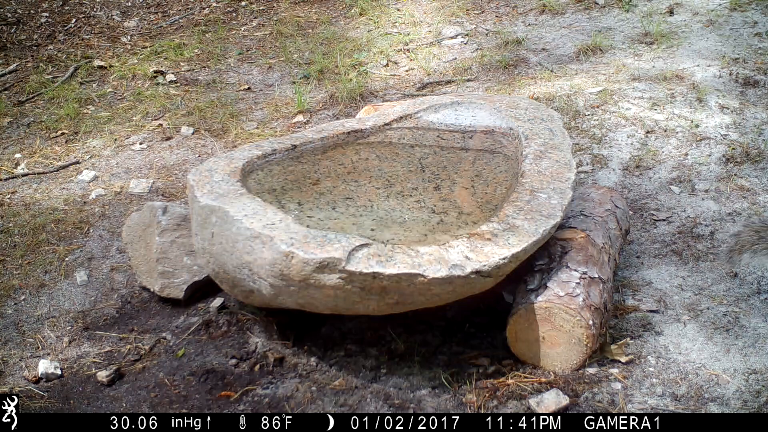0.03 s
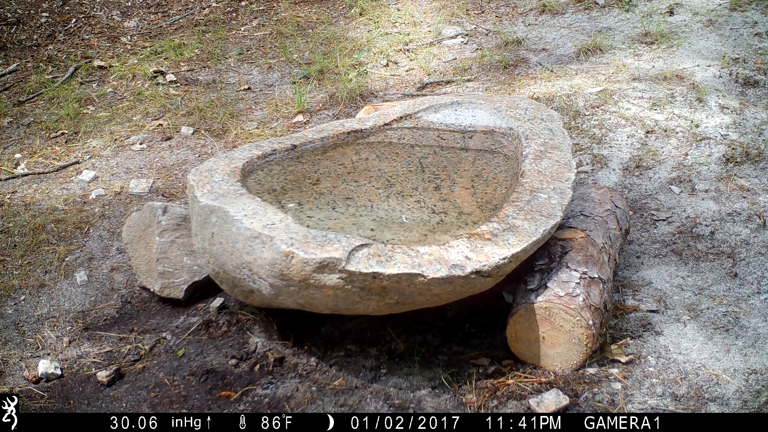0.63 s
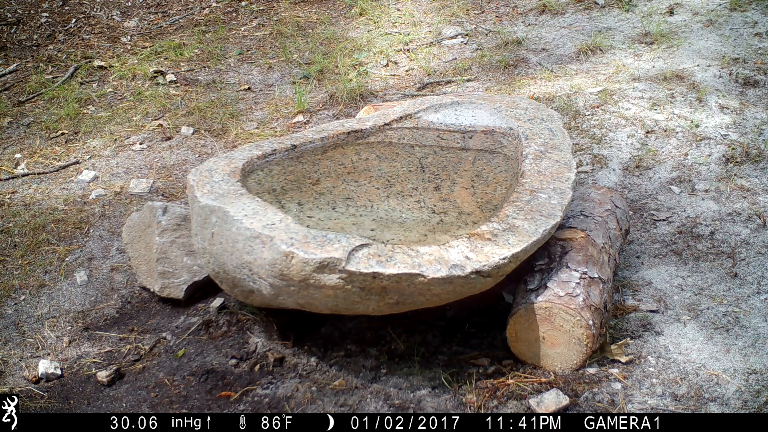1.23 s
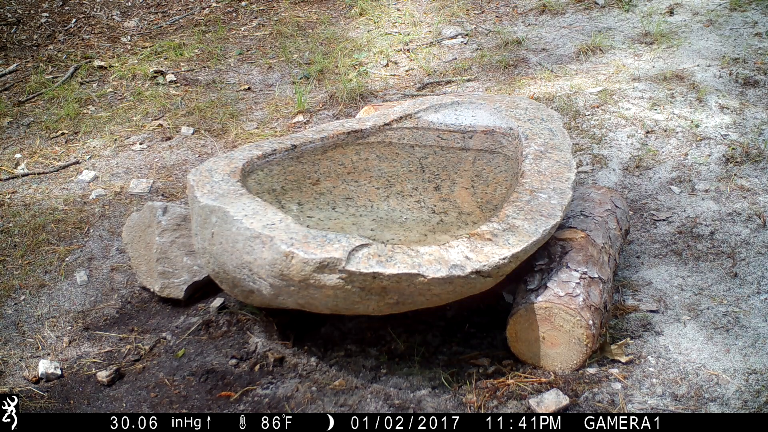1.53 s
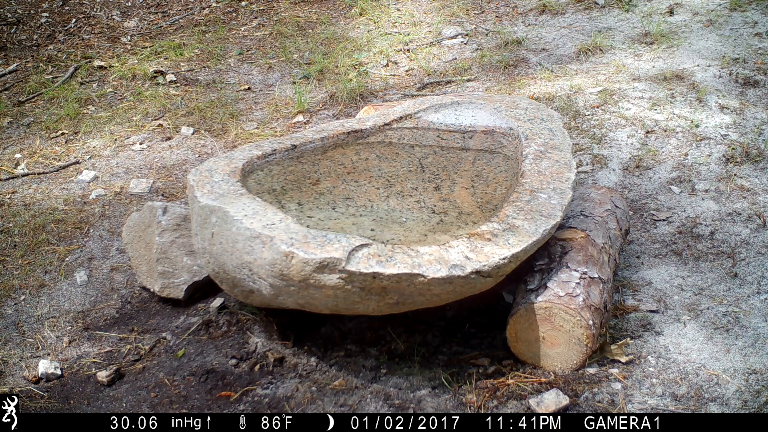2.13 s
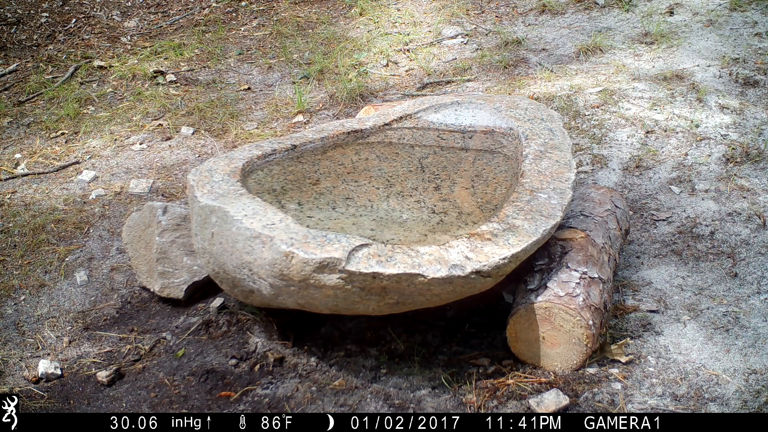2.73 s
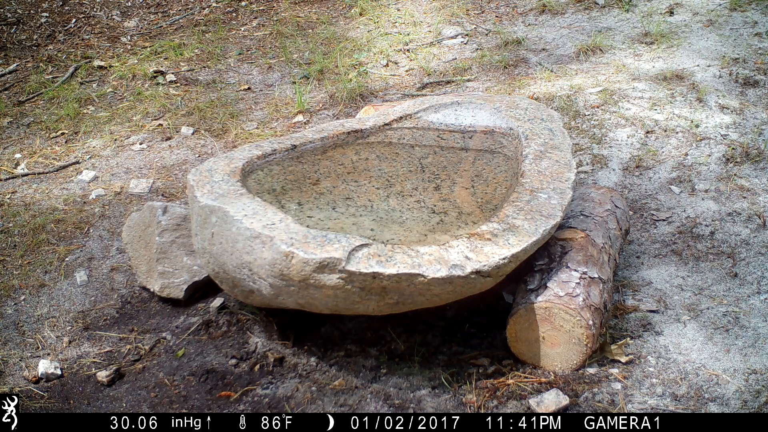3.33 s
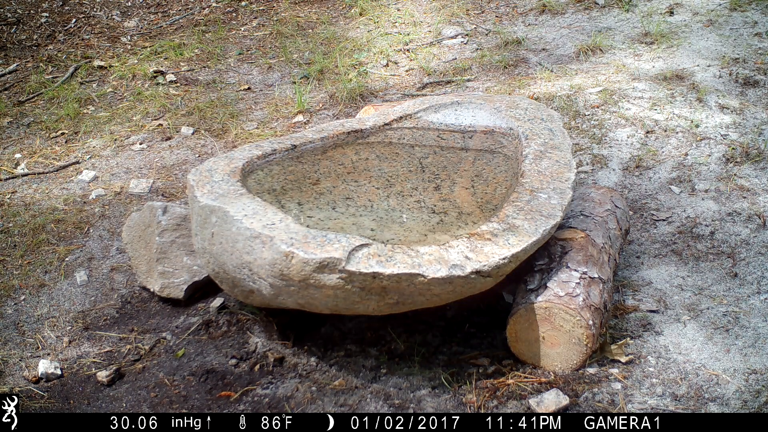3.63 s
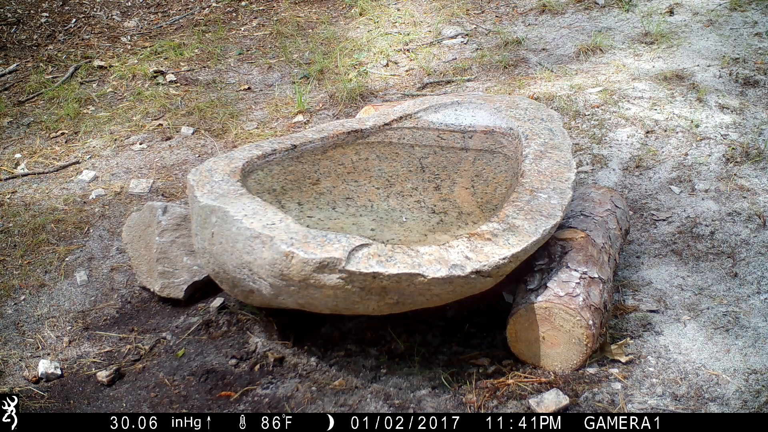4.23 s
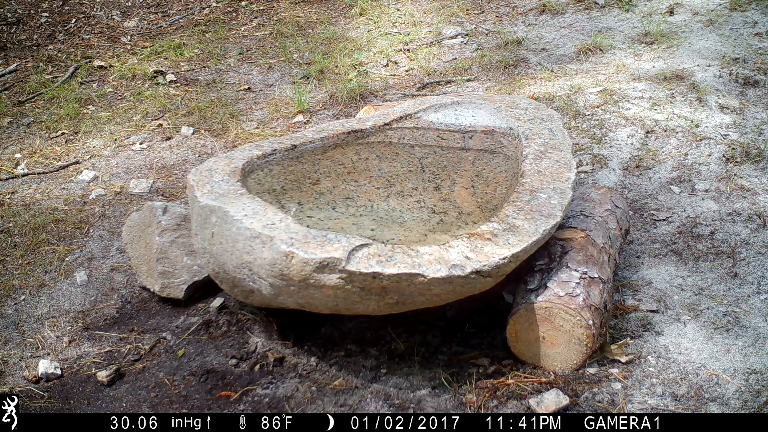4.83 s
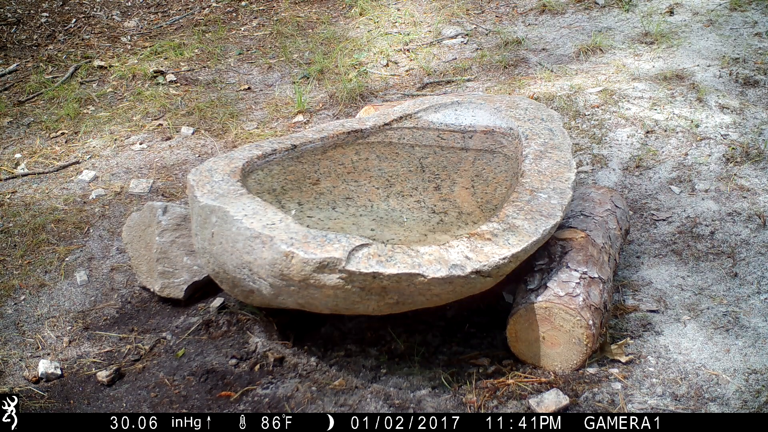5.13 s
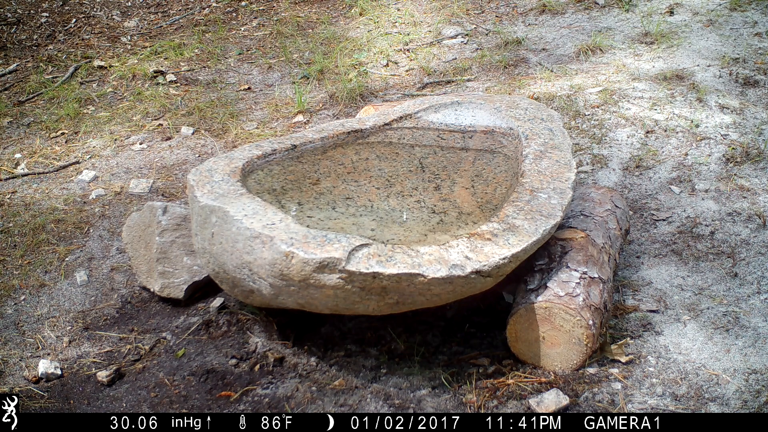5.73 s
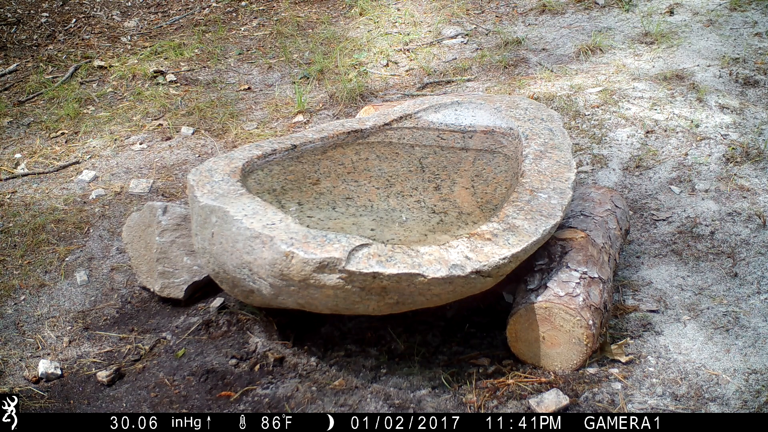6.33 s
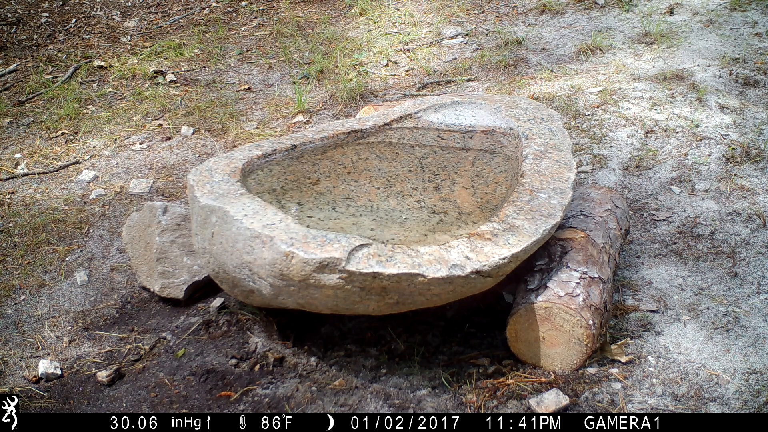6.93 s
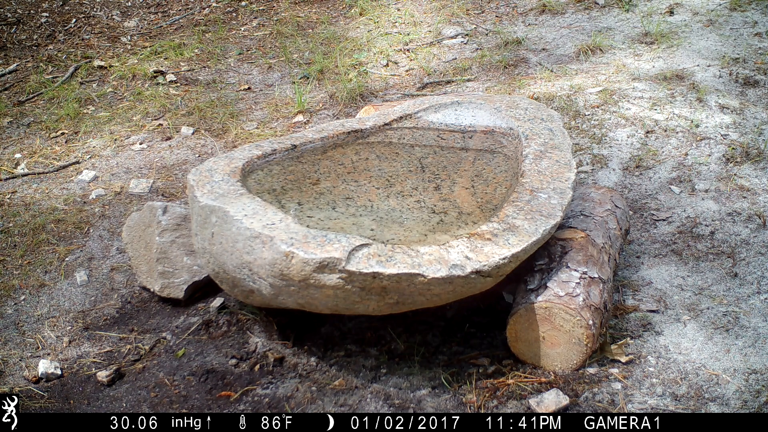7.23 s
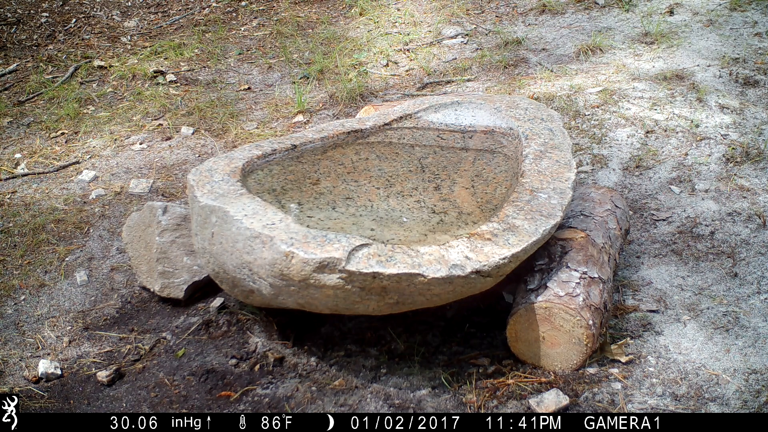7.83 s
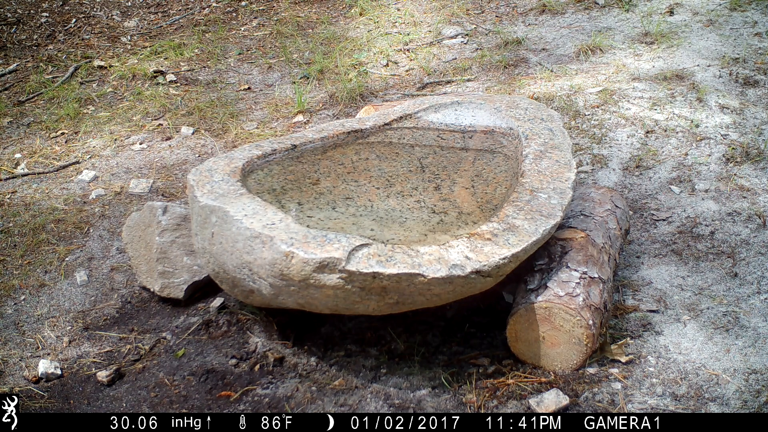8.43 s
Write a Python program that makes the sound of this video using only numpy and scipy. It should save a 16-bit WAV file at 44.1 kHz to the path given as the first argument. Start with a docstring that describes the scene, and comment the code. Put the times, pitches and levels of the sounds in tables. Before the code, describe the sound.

Two jays give harsh, jeering calls in a wood, then one calls alone, over soft low knocks and a steady hiss.

```python
"""Two jays jeer in a wood, overlapping at first, then one alone; a trail camera listens.
Each call is two linked voices, made by two vibrating membranes in the bird's throat. They swoop up,
sag, and break into a rasp as the air pressure falls. The trees echo the calls.
Soft low knocks and rumbles come in flurries over a steady hiss and the camera's faint whine."""
import sys
import numpy as np
from scipy import signal
from scipy.fft import rfft, irfft, next_fast_len
from scipy.io import wavfile
from scipy.ndimage import map_coordinates

SR = 44100
rng = np.random.default_rng(int(sys.argv[2]) if len(sys.argv) > 2 else 0)


def bounce(signal):
    """Save signal as a 16-bit WAV file at the path given by the first command-line argument."""
    frames = np.transpose(np.atleast_2d(signal))
    limited = np.clip(frames, -1, 1)
    pcm = np.round(limited * 32767).astype(np.int16)
    wavfile.write(sys.argv[1], SR, pcm)


N = 383229


def jeering_jay():
    """The harsh caller: its second voice settles at two thirds of the main voice's pitch."""
    # Calls: (start [s], length [s], top pitch [Hz], sag [Hz/s], time of failing pressure [s], level [dB],
    # opening accent [dB], swell [dB], octave boost [dB], sum tone boost [dB], overtone boost [dB],
    # second voice's extra pitch at first [share of main], time to lock [s], breaking pitch [Hz])
    jeers = [(1.805, .57, 1892, 387.6, 0.092, -46, 2.5, 1, -2, -2, 0, .015, 0.16, 1706),
             (2.62, 0.49, 1869, 356, 0.16, -44.5, 0, 1, 2, -1.5, -3, .015, .1, 1713),
             (5.045, 0.54, 1824, 181.2, 0.17, -44, -10, 2, -1.5, 0.5, 1, 0.068, 0.15, 1653),
             (5.869, .496, 1867, 341.2, .172, -42.5, -4.5, -0.5, 0, -1, 0.5, .042, .35, 1676),
             (6.759, 0.43, 1849, 368.3, 0.2, -44.5, -3, -3, 4.5, 0.5, 1, 0.068, 0.27, 1643)]
    # Tones the two voices make together: (multiple of main voice, multiple of second voice)
    tones = [(1, 0), (2, 0), (1, 1), (0, 2), (3, -2), (0, 3), (1, 2), (2, 1), (3, 0), (2, 2), (3, 1),
             (4, 0), (3, 2), (4, 1), (5, 0), (4, 2), (5, 1), (6, 0), (5, 2), (6, 1), (7, 0)]
    # Strength of each tone before the throat shapes it: (level [dB])
    base_db = [-5.5, -7.5, -2.5, -7, -16.5, -13, -7.5, -9.5, 0.5, -7.5, -9.5, 0.5, -9.5, -9.5, -3.5, -13.5,
               -11.5, -5.5, -12.5, -11, -8]
    ratio = 2 / 3
    out = np.zeros(N)
    for start, *shape, octave_db, sum_db, overtones_db, sharp, lock_s, break_hz in jeers:
        boost_db = {(2, 0): octave_db, (1, 1): sum_db}
        tone_db = [db + boost_db.get((m, n), 0) + overtones_db * (m + n * ratio > 2)
                   for (m, n), db in zip(tones, base_db)]
        pitch, level_db = call_shape(*shape, fall_hz_per_s=610)
        out += call(start, pitch, level_db, tones, tone_db, ratio, sharp, lock_s,
                    jitter=.0031, rasp=.021, break_hz=break_hz, second_soft_db=13, broken_db=-1.45)
    return out


def whistling_jay():
    """The clearer caller: a strong octave, with a weak second voice at half the main pitch."""
    # Calls: (start [s], length [s], top pitch [Hz], sag [Hz/s], time of failing pressure [s], level [dB],
    # opening accent [dB], swell [dB])
    whistles = [(1.643, .406, 1901, 216.7, .1, -42, -3, 2.5), (2.282, .4, 1905, 360.4, 0.064, -42, -6, -2)]
    # Tones the two voices make together: (multiple of main voice, multiple of second voice)
    tones = [(1, 0), (2, 0), (1, 1), (2, 1), (3, 0), (3, 1), (4, 0), (4, 1), (5, 0), (5, 1), (6, 0), (7, 0)]
    # Strength of each tone before the throat shapes it: (level [dB])
    tone_db = [-11.5, -3.5, -4, -16.5, -10.5, -1, -3, -11, -3.5, -7.5, -6.5, -8.5]
    out = np.zeros(N)
    for start, *shape in whistles:
        pitch, level_db = call_shape(*shape, fall_hz_per_s=1100)
        out += call(start, pitch, level_db, tones, tone_db, ratio=1 / 2, sharp=0, lock_s=1,
                    jitter=.0056, rasp=.033, break_hz=1733, second_soft_db=6.5, broken_db=-11.5)
    return out


def call_shape(length, top_hz, sag_hz_per_s, failing_s, db, accent_db, swell_db, fall_hz_per_s):
    """Pitch and level of a call: it swoops up, sags, falls faster as the pressure fails, then drops."""
    swoop_s, bend_s, drop_s, edge_s = .01, .01495, .015, .011
    t = np.arange(int(length * SR)) / SR
    failed_s = bend_s * np.logaddexp(0, (t - length + failing_s) / bend_s)  # eases in from zero
    held_hz = top_hz - sag_hz_per_s * t - fall_hz_per_s * failed_s
    swoop = 1 - .28 * np.exp(-t / swoop_s)
    drop = 1 - .1703 * np.exp((t - length) / drop_s)
    opening_db = accent_db * np.exp(-t / edge_s)
    ending_db = -6 * np.exp((t - length) / edge_s)
    return held_hz * swoop * drop, db + opening_db + swell_db * (t / length - .5) + ending_db


def call(start, pitch, level_db, tones, tone_db, ratio, sharp, lock_s,
         jitter, rasp, break_hz, second_soft_db, broken_db):
    """Two membranes vibrate together, making tones at sums and differences of their pitches' multiples."""
    size = len(pitch)
    t = np.arange(size) / SR
    # At low pressure the pitch sags and both membranes turn rough, less so in the opening swoop.
    rough = np.clip(.6 + t / .3, 0, 1) / (1 + np.exp((pitch - break_hz) / 30))
    waver = .003 * wobble(43.9, size) + jitter * wobble(201, size) + rasp * rough * wobble(700, size)
    main_phase = 2 * np.pi * np.cumsum(pitch * (1 + waver)) / SR
    # The second voice starts high by `sharp`, locks to the main one, and shakes loose in the rasp.
    slip = np.cumsum(pitch * sharp * np.clip(1 - t / lock_s, 0, 1)) / SR
    shake = (.09 + .38 * rough) * wobble(400, size)
    second_phase = ratio * main_phase + 2 * np.pi * (slip - slip[-1]) + shake + np.pi / 6
    second_hz = pitch * ratio + np.gradient(slip) * SR
    second_db = -second_soft_db * np.clip(1 - t / t[-1] / .68, 0, 1)  # full 68% of the way through
    voice = np.zeros(size)
    for (m, n), db in zip(tones, tone_db):
        is_main = (m, n) == (1, 0)
        follows = 1 if (m, n) == (1, 1) else .13 * (n != 0)  # the sum tone follows the second voice most
        drift_db = (.9 if is_main else 2.2) * wobble(25.7, size)
        rasp_db = rough * (broken_db - is_main)  # the main tone loses up to 1 dB more
        throat_db = throat(m * pitch + n * second_hz)
        gain = amp(level_db + db + throat_db + follows * second_db + rasp_db + drift_db)
        flutter = amp(.64 * np.sqrt(m + n * ratio) * wobble(109.3, size))  # higher tones are less steady
        voice += np.sqrt(2) * gain * flutter * np.sin(m * main_phase + n * second_phase)
    fade = np.clip(np.minimum(t, t[-1] - t) / .0031, 0, 1)
    sound = (voice + breath(level_db, rough)) * fade
    return np.pad(sound, (int(start * SR), N))[:N]


def throat(hz):
    """Gain in dB of the throat and bill: tones swell as they slide through pitches where these ring."""
    # Broad shape: (frequency [Hz], gain [dB])
    shape = [(900, -45), (1300, 8.5), (1600, -4), (2300, -8), (2900, -1.5), (3850, 2), (4400, -8),
             (4750, -16.5), (5250, -18.5), (5600, -18.5), (6700, -28.5), (8000, -39.5), (9200, -36.5),
             (10000, -45), (14000, -50)]
    # Narrow resonances: (frequency [Hz], half width [Hz], gain [dB])
    peaks = [(1800, 76, 6.5), (2924, 69, 3), (3394, 58, -0.5), (3735, 81, 2.5), (5260, 75, 3.5)]
    return along(shape, hz) + sum(db * np.exp(-((hz - centre) / width) ** 2) for centre, width, db in peaks)


def breath(level_db, rough):
    """Swirling air rushes through the throat, loudest in the rasp."""
    # Tone colour of the air: (frequency [Hz], level [dB])
    colour = [(900, -55.5), (1600, -10), (2400, -6), (3000, 1), (3750, -5), (4400, -7), (5200, -18.5),
              (6700, -30.5), (8000, -44.5), (10000, -50), (14000, -65)]
    return amp(level_db) * (amp(-19) + amp(-6.5) * rough) * noise(colour)[:len(rough)]


def trees(x):
    """Near twigs blur a call for a few hundredths of a second; the wood beyond adds a long echo."""
    # Echo of the wood: (frequency [Hz], time to fade by 60 dB [s])
    fade_times = [(1000, 0.52), (2900, 0.66), (3450, 0.7), (3900, 0.64), (6000, 0.64), (12000, 0.28)]
    # What twigs and leaves throw back: (frequency [Hz], gain [dB])
    scatter = [(1500, -9.5), (2300, 1), (2900, -5.5), (3450, 2), (3850, -2), (5000, -3), (7000, 2.5),
               (12000, 8)]
    twig_fade_s = .068
    hz, t, bands = signal.stft(rng.standard_normal(SR), SR, nperseg=256)
    fading = amp(-60 * t / along(fade_times, hz)[:, None])
    tail = signal.istft(bands * fading, SR, nperseg=256)[1]
    twigs = rng.standard_normal(len(tail)) * amp(-60 * np.arange(len(tail)) / SR / twig_fade_s)
    near = amp(-11) * twigs / np.linalg.norm(twigs)
    far = amp(-6.5) * tail / np.linalg.norm(tail)
    echo = signal.fftconvolve(x, near + far)[:N]
    return filtered(echo, lambda hz: amp(along(scatter, hz)))


def knocks():
    """Soft, dull bumps of about one wave each; faint ones fall at random, as strong as the rumble."""
    # The clearest knocks: (time [s], level [dB], pitch [Hz])
    clear = [(.111, -51, 111), (.416, -44, 150), (0.431, -44, 112), (0.478, -47.5, 161), (.601, -50, 129),
             (.662, -46, 170), (0.671, -39, 130), (.711, -35.5, 207), (.772, -43.5, 165),
             (.995, -48.5, 110), (1.229, -40, 167), (1.423, -37.5, 169), (1.605, -40.5, 187),
             (2.04, -48, 133), (2.093, -38, 188), (2.268, -49.5, 107), (2.325, -46, 153), (2.365, -52, 143),
             (3.145, -49, 158), (3.16, -40.5, 165), (3.177, -46.5, 117), (4.582, -49.5, 133),
             (4.669, -54, 179), (4.88, -55, 119), (5.544, -48, 117), (8.064, -49.5, 138), (8.447, -45, 119),
             (8.553, -49.5, 132)]
    faint_per_s, faint_hz = 14, 130
    t, out, strength = np.arange(N) / SR, np.zeros(N), rumble_strength()
    faint = []
    for when, soft, tone in rng.random((int(faint_per_s * N / SR), 3)):
        rumble_db = 20 * np.log10(strength[int(when * N)])
        faint.append((when * N / SR, rumble_db + 5 - 7 * soft, faint_hz * 2 ** (tone - .5)))
    for time, db, hz in clear + faint:
        near = slice(*np.searchsorted(t, [time - .04, time + .04]))
        cycles = (t[near] - time) * hz
        wave = np.sin(2 * np.pi * cycles + rng.normal(0, .36))
        out[near] += amp(db + 6) * wave / np.cosh(cycles / .21)
    return out


def rumble():
    """A low, lumpy noise that swells in flurries."""
    # Tone colour of the rumble: (frequency [Hz], level [dB])
    colour = [(15, -10.5), (35, 3), (85, 4), (140, -2.5), (250, -21), (500, -40), (1000, -99.5)]
    lumpy = unit(noise(colour) * amp(3 * wobble(30, N)))
    return amp(2.25) * rumble_strength() * lumpy


def rumble_strength():
    """How strong the rumble and faint knocks are over time: calm, except in the flurries."""
    # Flurries: (start [s], length [s], level [dB])
    flurries = [(0.396, 0.43, -59), (0.976, .3, -60.5), (1.553, 0.18, -65.5), (2.022, .45, -64),
                (2.946, 0.34, -67), (3.502, 0.55, -73.5), (4.527, 0.44, -69.5), (5.26, .4, -74.5),
                (7.877, 0.74, -65)]
    calm_db, edge_s = -77, .035
    t = np.arange(N) / SR
    rise = lambda time: (1 + np.tanh((t - time) / edge_s)) / 2
    return amp(calm_db) + sum(amp(db) * rise(start) * (1 - rise(start + length))
                              for start, length, db in flurries)


def hiss():
    """A soft, steady hiss behind everything."""
    # Tone colour of the hiss: (frequency [Hz], level [dB])
    colour = [(59, -42.5), (100, -17), (129, -12), (153, -5.5), (275, -6), (306, -5.5), (497, -2.5),
              (654, -3), (758, -2), (1520, -4), (3390, -13.5), (6950, -37), (7890, -40.5), (8580, -44),
              (15500, -44)]
    return amp(-57) * noise(colour)


def camera_whine():
    """The camera's electronics give off thin, slightly wavering tones."""
    # Tones of the whine: (pitch [Hz], level [dB])
    tones = [(495.3, -76.5), (7768, -102), (7827, -91)]
    t = np.arange(N) / SR
    return sum(np.sqrt(2) * amp(db) * np.sin(2 * np.pi * hz * t + .5 * wobble(12, N)) for hz, db in tones)


def amp(db):
    """Turn decibels into a gain to multiply by."""
    return 10 ** (np.asarray(db) / 20)


def unit(x):
    """Scale a sound to an average (rms) size of 1."""
    return x / np.sqrt(np.mean(x ** 2) + 1e-20)


def along(points, hz):
    """Read between (frequency [Hz], value) points, with octaves evenly spaced."""
    frequencies, values = np.transpose(points)
    return np.interp(np.log(hz + 1), np.log(frequencies), values)


def wobble(rate, size):
    """A smooth curve through `rate` random values a second."""
    return map_coordinates(rng.standard_normal(int(size * rate / SR) + 4), [np.arange(size) * rate / SR])


def filtered(x, response):
    """Turn each frequency in x up or down by the gain response(hz)."""
    size = next_fast_len(N + 8192)
    return irfft(rfft(x, size) * response(np.fft.rfftfreq(size, 1 / SR)), size)[:N]


def noise(colour):
    """Noise with the given tone colour and an average size of 1."""
    return unit(filtered(rng.standard_normal(N), lambda hz: amp(along(colour, hz))))


def scene():
    """Both birds and their echo, over the background and the knocks, in one channel."""
    birds = amp(-.57) * whistling_jay() + amp(-.03) * jeering_jay()
    return (birds + trees(birds) + rumble() + camera_whine() + hiss() + knocks())[None]


def record(dry):
    """The camera is silent for the first moment and cuts off the highest treble."""
    start_s, top_hz = .036, 15700
    awake = np.arange(N) / SR > start_s
    return filtered(dry[0] * awake, lambda hz: hz < top_hz)[None]


dry = scene()
out = record(dry)
bounce(out)
```